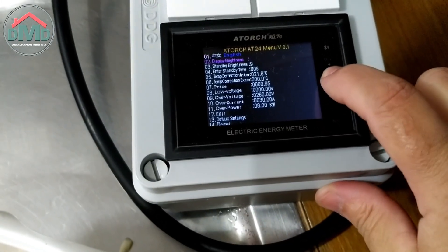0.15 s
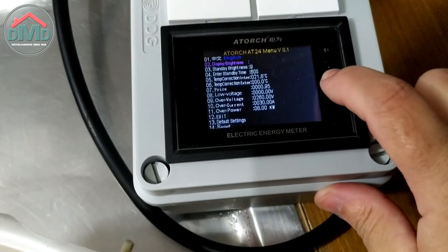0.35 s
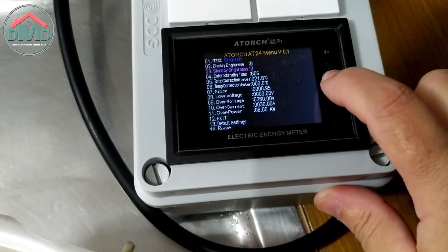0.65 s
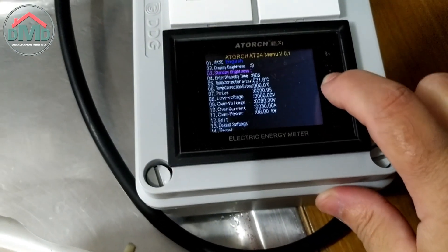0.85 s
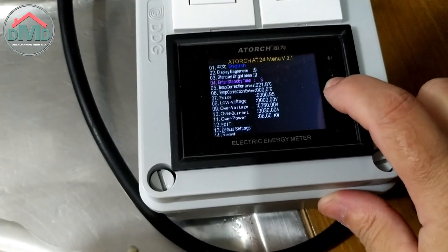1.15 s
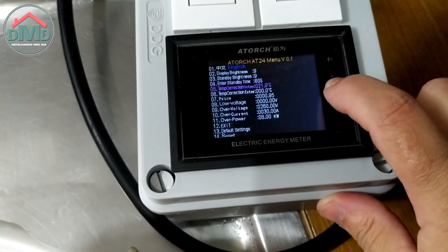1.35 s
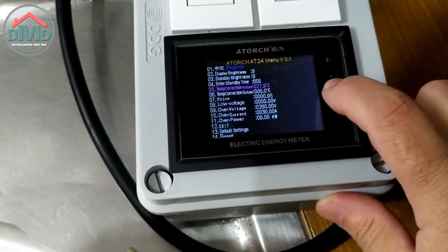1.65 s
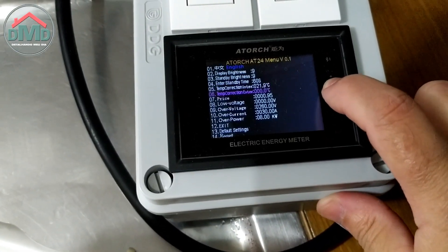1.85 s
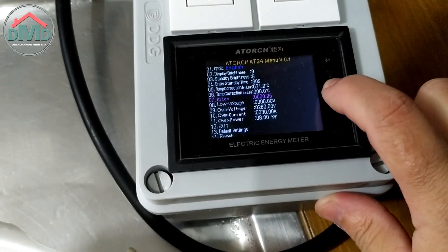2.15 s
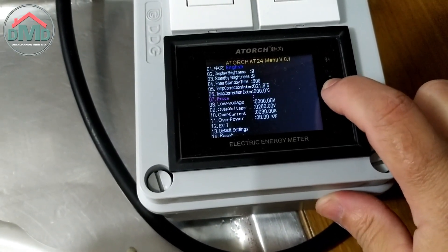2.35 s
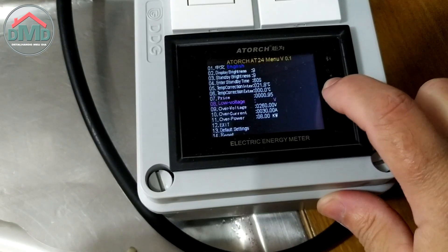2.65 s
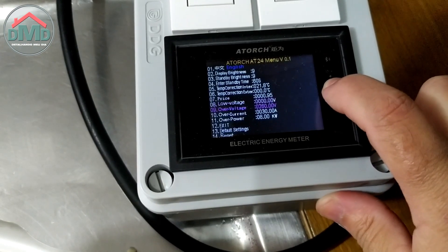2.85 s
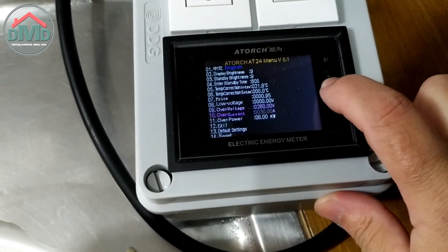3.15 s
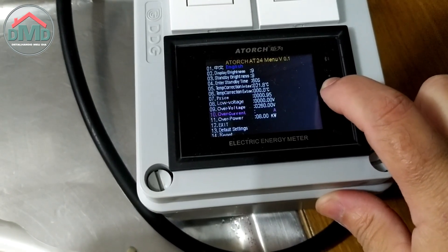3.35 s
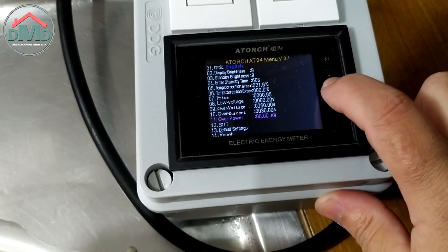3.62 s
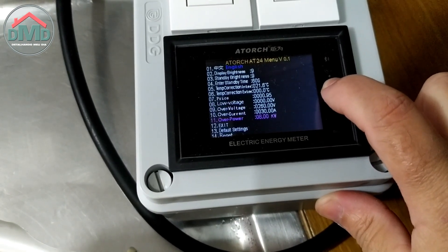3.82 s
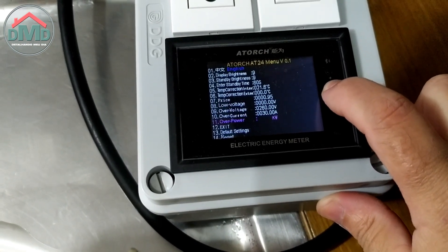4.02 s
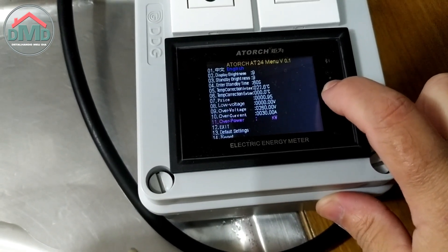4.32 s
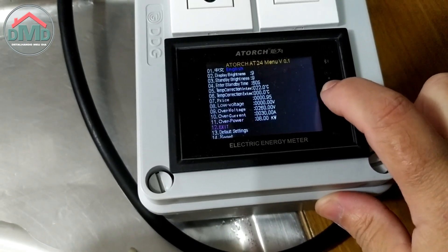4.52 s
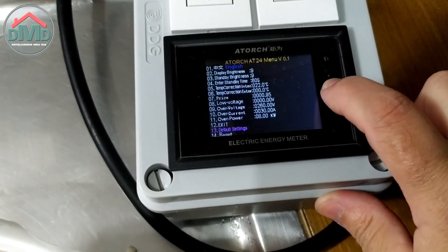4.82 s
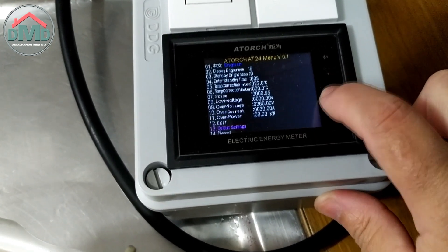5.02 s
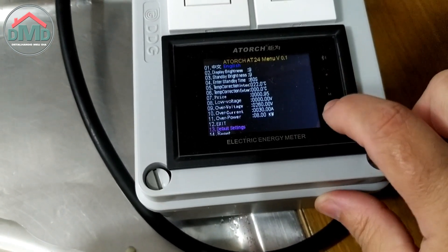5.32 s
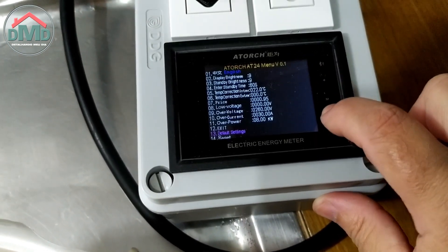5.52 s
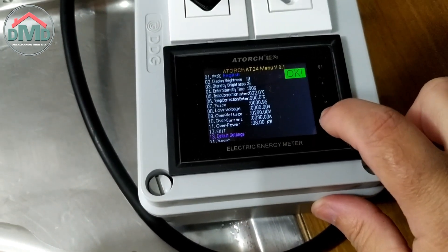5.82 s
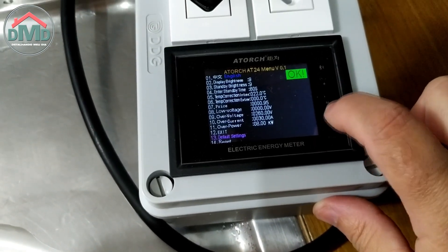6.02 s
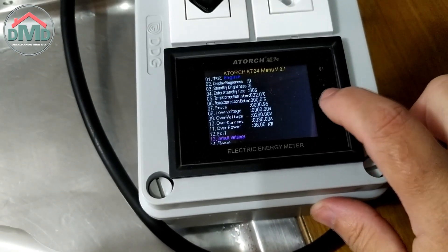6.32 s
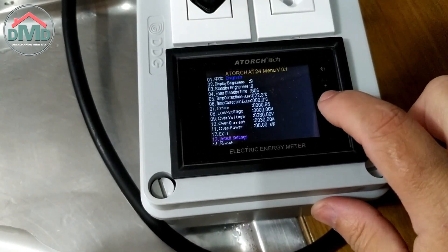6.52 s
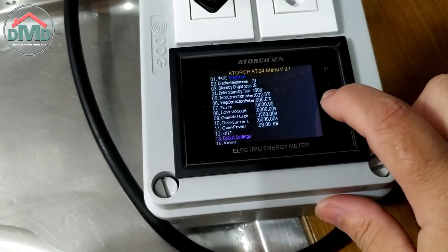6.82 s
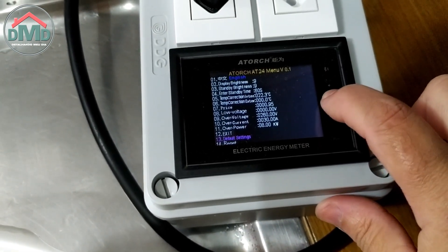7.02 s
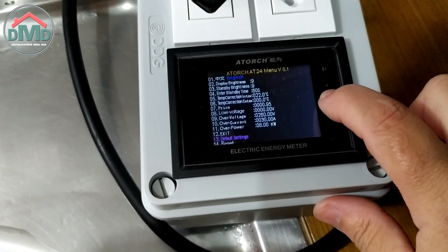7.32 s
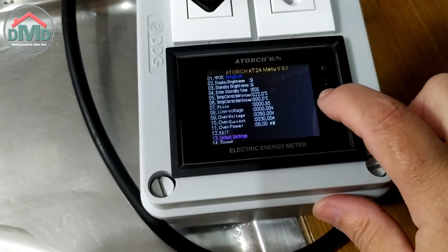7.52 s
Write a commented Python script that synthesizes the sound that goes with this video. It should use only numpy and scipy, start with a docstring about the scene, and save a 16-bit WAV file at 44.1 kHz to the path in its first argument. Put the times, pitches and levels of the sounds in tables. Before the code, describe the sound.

Close, crisp two-part button clicks on a hollow plastic case, rapid at first then sparser, above soft indoor hum and slight hiss.

```python
"""A click is heard first: a small push button of a plastic meter case on a bench is let go by a finger.
More presses and releases follow, close to a two-port phone microphone. Each snaps a metal dome: noise bursts
make its crack and rattle, and decaying sine modes make the case ring, with one fixed shape per direction.
A quiet room hums beneath: motor harmonics, a swelling drone, a gliding tone of far traffic, rumble and
microphone hiss, made from slowly wavering sines and filtered noise."""
import sys
import numpy as np
from scipy import signal
from scipy.fft import rfft, irfft, next_fast_len
from scipy.io import wavfile
from scipy.ndimage import uniform_filter1d

SR = 44100
rng = np.random.default_rng(int(sys.argv[2]) if len(sys.argv) > 2 else 0)


def dump_mix(stems):
    """Bounce the given channels to the path in sys.argv[1] as a 16-bit WAV at rate SR."""
    frames = np.atleast_2d(stems).T  # one column per channel
    limited = np.clip(frames, -1, 1)  # hard clip at full scale
    pcm = np.round(limited * 32767).astype(np.int16)
    wavfile.write(sys.argv[1], SR, pcm)


N = 338202
T = np.arange(N) / SR  # s


def undb(db):
    """Decibel law: level to amplitude ratio."""
    return 10 ** (np.asarray(db) / 20)


def decay(t, t60_s):
    """Exponential damping: the amplitude falls by 60 dB in t60_s."""
    return np.exp(-np.log(1000) * t / t60_s)


def on_log_hz(hz, table):
    """Logarithmic pitch scale: interpolate a (frequency, value) table along it."""
    f, v = np.transpose(table)
    return np.interp(np.log(hz + 1), np.log(f), v)


def over_time(table):
    """Linear interpolation of a (time, value) table over the whole scene."""
    return np.interp(T, *np.transpose(table))


def colour(x, gain):
    """Linear filtering: multiply the spectrum of each row by a gain."""
    size = next_fast_len(x.shape[-1])
    spectrum = rfft(x, size) * gain(np.fft.rfftfreq(size, 1 / SR))
    return irfft(spectrum, size)[..., :x.shape[-1]]


def unit(x):
    """Root-mean-square normalisation: scale to rms 1."""
    return x / np.sqrt(np.mean(x ** 2))


def walk(rate_hz):
    """Low-pass random fluctuation: held random steps, smoothed twice, with rms 1."""
    k = int(SR / rate_hz)
    steps = np.repeat(rng.standard_normal(N // k + 1), k)
    return unit(uniform_filter1d(uniform_filter1d(steps, k), k)[:N])


def add(out, s, sound):
    """Superposition: sum a sound into the rows of out from time s."""
    i = int(s * SR)
    out[:, i:i + sound.shape[1]] += sound[:, :N - i]


def band(hz, width_hz, size=N):
    """Resonance curve: noise shaped by one peak, rms 1."""
    return unit(colour(rng.standard_normal(size), lambda f: 1 / (1 + (2 * (f - hz) / width_hz) ** 2)))


def tone(hz, db):
    """Phase is the integral of frequency: a sine of given rms level and random starting phase."""
    phase = 2 * np.pi * np.cumsum(hz + 0 * T) / SR
    return np.sqrt(2) * undb(db) * np.sin(phase + rng.uniform(0, 2 * np.pi))


def ports(x):
    """Port resonance: each microphone opening lifts the treble at its own frequencies."""
    # resonances added to the direct sound, left list then right: f/Hz, width/Hz, level/dB
    port_modes = [
        [(7900, 490, 1.5), (9860, 1270, 17.5)],
        [(8600, 830, 17.5), (9600, 2200, 2.5)],
    ]
    out = x.copy()
    for side, modes in enumerate(port_modes):
        for hz, width_hz, db in modes:
            resonator = signal.iirpeak(hz, hz / width_hz, fs=SR)
            out[side] += undb(db) * signal.lfilter(*resonator, x[side])
    return out


def hiss():
    """Self-noise: microphone hiss, independent at the two ports and lifted by their resonances."""
    # relative hiss spectrum: f/Hz, level/dB
    hiss_curve = [(300, -16), (1000, -0.5), (2500, 4.5), (4500, -0.5), (6500, -3), (9000, -10),
                  (11500, -10), (14200, -0.5), (14400, -56)]
    hiss_db = -62.5  # rms before the ports
    noise = colour(rng.standard_normal((2, N)), lambda hz: undb(on_log_hz(hz, hiss_curve)))
    return undb(hiss_db) * ports(unit(noise))


def room():
    """Diffuse-field coherence: long rumble waves reach both ports much alike, shorter ones less so."""
    # relative rumble spectrum: f/Hz, level/dB
    room_curve = [(10, -5), (24, -0.5), (33, -2), (42, -21), (60, -15), (72, -16.5), (110, -16.5),
                  (150, -26.5), (220, -28), (330, -32.5), (480, -31), (700, -36.5), (1500, -46),
                  (3000, -92.5)]
    # likeness of the two ports: f/Hz, left-right correlation
    coherence = [(60, 0.92), (130, 0.89), (290, 0.52), (640, 0), (1400, 0.18)]
    room_db = -44  # rms

    def share(sign):
        def gain(hz):
            alike = np.clip(on_log_hz(hz, coherence), 0, 1)
            return undb(on_log_hz(hz, room_curve)) * np.sqrt(1 + sign * alike)
        return gain
    mid, side = (colour(rng.standard_normal(N), share(sign)) for sign in (1, -1))
    return undb(room_db) * unit(np.array([mid + side, mid - side]))


def motor():
    """Harmonic series: a motor hums at multiples of one frequency, each wavering in level."""
    # harmonics: multiple of the fundamental, mean level/dB
    harmonics = [(1, -52.5), (2, -62), (3, -91), (5, -74), (6, -70), (7, -77.5), (8, -72.5), (9, -80),
                 (10, -85), (14, -73.5)]
    fundamental_hz, waver_db = 59.44, 0.47  # waver is rms
    return sum(tone(k * fundamental_hz, db + waver_db * walk(5.9)) for k, db in harmonics)


def drone():
    """Frequency modulation: a low tone of wandering pitch swells and sinks."""
    # level of the drone: t/s, level/dB
    drone_level = [(0, -60.5), (1.2, -52), (1.5, -65), (2.7, -50), (4.9, -60), (5.7, -51), (6.04, -62),
                   (6.5, -44), (6.9, -54.5), (7.1, -50), (7.67, -56)]
    drone_hz, wander_hz = 82.4, 1.5  # wander is rms
    return tone(drone_hz + wander_hz * walk(2.7), over_time(drone_level))


def traffic():
    """Random modulation: far traffic, a rough tone gliding upward, with bands of rumble as it goes by."""
    # mean course of the tone: t/s, f/Hz, level/dB
    glide_course = [(2.0, 112, -69), (3.5, 115.5, -69), (5.201, 132, -60), (6.299, 145.1, -67),
                    (7.0, 173.2, -66), (7.3, 193.8, -59.5), (7.67, 197, -62)]
    # level of the lower rumble band: t/s, level/dB
    rumble_level = [(6.6, -76), (7.0, -78), (7.4, -65), (7.67, -58.5)]
    s, hz, db = np.transpose(glide_course)
    rough_hz = np.interp(T, s, hz) * (1 + 0.01947 * walk(9.8))
    glide = tone(rough_hz, np.interp(T, s, db) + 2.5 * walk(3.3))
    rumble = np.array([band(140, 50) + 0.72 * band(280, 40) for _ in range(2)])
    return glide + undb(over_time(rumble_level)) * rumble


def rub():
    """Friction noise: skin slides over the plate for a moment, a soft hiss under a Gaussian envelope."""
    skin = np.array([band(8000, 7000) for _ in range(2)])
    rub_db, centre_s, width_s = -68, 5.22, 0.033  # level before the ports
    return undb(rub_db) * np.exp(-((T - centre_s) / width_s) ** 2) * ports(skin)


def echoes(body, t60_s=0.53):
    """Reverberation as convolution: dense decaying noise answers the case, different at each port."""
    # room answer: f/Hz, level/dB
    wall_curve = [(200, -19), (450, -21), (600, -25), (800, -25), (1100, -20), (1400, -19), (2000, -14),
                  (3000, -14)]
    build_up_s = 0.019
    t = T[:SR // 3]
    tail = rng.standard_normal((2, len(t))) * decay(t, t60_s) * (1 - np.exp(-t / build_up_s))
    tail /= np.sqrt(np.sum(tail ** 2, axis=1, keepdims=True))  # unit energy
    answer = signal.fftconvolve(body, tail, axes=1)[:, :N]
    return colour(answer, lambda hz: undb(on_log_hz(hz, wall_curve)))


def snap(rise_s, t60_s, tail_db, tail_t60_s, tilt_db=0):
    """Two-rate decay: a dome's crack and rattle, then bench and walls; unrelated at the two ports."""
    # relative spectrum before the tilt: f/Hz, level/dB
    snap_curve = [(800, 4), (1500, 10.5), (2500, 7), (4000, -0.5), (6000, -5.5), (9000, -9), (12000, -15.5),
                  (14000, -22), (14600, -39), (15600, -42.5)]
    t = T[:SR // 3]
    fall = decay(t, t60_s) + undb(tail_db) * decay(t, tail_t60_s)

    def gain(hz):
        tilt = tilt_db * np.log2((hz + 1) / 6000)  # tilt_db is per octave
        return undb(on_log_hz(hz, snap_curve) + tilt)
    noise = unit(colour(rng.standard_normal((2, len(t))), gain))
    return noise * fall * (1 - np.exp(-t / rise_s))


def tick(delay_s, hz=8600, width_s=0.00032, edge_db=-14, edge_s=.00004, bounce_s=.0014, bounce_db=-5):
    """Short pulses have broad spectra: the dome flips with a sharp tick, answered by the bench in fading
    bursts, right port first."""
    port_lag_s = 0.000088
    t = T[:SR // 100] - delay_s - np.array([[port_lag_s], [0]])
    edge_gain = undb(edge_db) * width_s / edge_s
    out = 0
    for k in range(4):
        u = t - k * bounce_s
        burst = np.exp(-(u / width_s) ** 2) + edge_gain * np.exp(-(u / edge_s) ** 2)
        carrier = np.cos(2 * np.pi * hz * u + rng.uniform(0, 2 * np.pi))
        out = out + undb(k * bounce_db) * burst * carrier
    return out


def ring(column):
    """Modal superposition: the case after one sharp push, as rows thump, ring and clack; their sum peaks at 1."""
    # case modes: f/Hz, t60/s, relative swing on release, on press; the sign is the starting direction
    case_modes = [(134.8, 0.218, 0.08, 0.02), (183.2, 0.175, -0.06, -0.04), (271.3, 0.161, -0.14, -0.07),
                  (302.3, 0.169, 0.09, 0.03), (361.7, 0.168, 0.12, 0.06), (406.0, 0.025, -0.09, 0.1),
                  (469.0, 0.087, -0.06, -0.07), (541.0, 0.147, -0.05, -0.04), (580.9, 0.35, 0.02, 0.01),
                  (621.2, 0.082, -0.21, -0.12), (659.0, 0.037, 0.51, 0.33), (671.2, 0.14, -0.34, -0.2),
                  (686.1, 0.129, -0.44, -0.3), (701.5, 0.167, -0.24, -0.16), (717.5, 0.165, -0.16, -0.11),
                  (736.0, 0.037, 0.87, 0.64), (765.7, 0.052, -0.61, -0.43), (817.1, 0.076, 0.11, 0.1),
                  (871.4, 0.059, -0.35, -0.14), (923.0, 0.276, 0.03, 0.02), (949.0, 0.063, 0.28, 0.17),
                  (1019.6, 0.13, 0.04, 0.05), (1062.4, 0.055, 0.83, 0.44), (1103.1, 0.055, -0.32, -0.2),
                  (1185.5, 0.044, -0.22, -0.14), (1500.9, 0.015, 0.59, 0.48), (1670.5, 0.057, -0.13, -0.15),
                  (2122.5, 0.015, -0.06, -0.23), (2315.9, 0.013, -0.18, -0.21), (2839.7, 0.016, 0.08, 0.18)]
    thump_hz, clack_hz = 450, 1300  # modes below the first thump, modes above the second clack
    t = T[:SR // 3, None]
    hz, t60_s, *_ = mode = np.array(case_modes).T
    y = np.sin(2 * np.pi * hz * t) * decay(t, t60_s) * mode[column]
    group = np.digitize(hz, [thump_hz, clack_hz])
    rows = np.array([y[:, group == k].sum(axis=1) for k in range(3)])
    return rows / np.abs(y.sum(axis=1)).max()


def touches(case, crack):
    """Impulsive contact: a fingertip brushing the face plate adds faint treble noise and a damped knock."""
    # brushes: t/s, treble level/dB, knock level/dB, both at the start and before decay
    brushes = [(4.997, -54, -54), (5.01, -60, -47.5), (6.004, -46.5, -41.5), (6.016, -68, -62)]
    t = T[:SR // 20]
    for s, treble_db, knock_db in brushes:
        add(crack, s, undb(treble_db) * snap(0.00043, 0.028, -7, 0.12, tilt_db=5.5))
        knock = band(1180, 1100, size=len(t))[None] * np.exp(-t / 0.007)
        add(case[1:2], s, undb(knock_db) * knock)


def domes(case, crack):
    """Snap-through buckling: presses push the case in, releases let it spring out."""
    # dome snaps down: t/s, rattle level/dB, first tick level/dB, treble left minus right/dB
    press = [(0.376, -33, -29.5, 0), (0.836, -29.5, -27, -0.5), (1.131, -29, -27.5, 0.5),
             (1.589, -30.5, -32.5, -2), (1.868, -31, -35, -0.5), (2.326, -31.5, -32, 0),
             (2.639, -31.5, -32.5, -2), (2.973, -33.5, -33, -2.5), (3.338, -34, -33, 1),
             (4.218, -35.5, -32.5, -1.5), (4.567, -35.5, -33, -0.5), (5.42, -28, -19.5, -4),
             (6.705, -29, -22, -3)]
    # dome springs back: the same columns
    release = [(0.037, -28, -27.5, -4.5), (0.669, -29, -38.5, 0.5), (0.993, -29, -31, 1),
               (1.406, -30, -33.5, -2.5), (1.73, -28.5, -29.5, -3), (2.154, -29, -37, -1),
               (2.486, -29.5, -31.5, 0.5), (2.802, -28, -31, 0.5), (3.109, -30.5, -35.5, 0.5),
               (3.535, -30, -31.5, 0), (4.381, -28, -43, 0), (4.772, -28, -34, -4), (5.617, -26, -50, 0)]
    # base levels of thump, ring and clack, alike each time
    press_case_db, release_case_db = (-18.5, -18.5, -17.5), (-14.5, -15, -15.5)
    # crispness is tick above rattle in dB; each dB tilts the treble (dB per octave) and shifts the case (dB)
    crisp_tilt_db, crisp_case_db = 0.73, np.array((0.48, 0.08, -0.56))
    # the lowest button, worked in this span, sits near a corner and shifts thump, ring and clack
    corner_s, corner_case_db = (5.2, 6.2), np.array((1, -1, -4.5))
    snap_delay_s = .0005  # the dome cracks just after the case starts to move
    for table, shape, case_db, rise_s in ((press, -ring(column=3), press_case_db, .0005),
                                          (release, ring(column=2), release_case_db, .0012)):
        for s, snap_db, tick_db, pan_db in table:
            crisp = max(tick_db - snap_db, 0)
            corner = corner_s[0] < s < corner_s[1]
            part_db = case_db + crisp * crisp_case_db + corner * corner_case_db
            add(case, s, undb(part_db)[:, None] * shape)
            pan = undb(np.array([[pan_db], [-pan_db]]) / 2)
            rattle = snap(rise_s, 0.041, -15.0, 0.19, crisp_tilt_db * crisp)
            add(crack, s + snap_delay_s, pan * undb(snap_db) * rattle)
            add(crack, s + snap_delay_s, pan * undb(tick_db) * tick(1.6 * rise_s))


def buttons():
    """Propagation delay: case and dome sounds reach the nearer right port before the left."""
    # left port after right, one entry each for thump, ring and clack: lag/s
    case_lags = [0.00027, 0.00016, .00009]
    case, crack = np.zeros((3, N)), np.zeros((2, N))
    domes(case, crack)
    touches(case, crack)
    left = sum(np.interp(T - lag, T, part) for lag, part in zip(case_lags, case))
    body = np.array([undb(-0.27) * left, case.sum(axis=0)])
    return body + echoes(body) + ports(crack)


def scene():
    """Superposition of the background, the rubbing skin and the buttons."""
    return hiss() + room() + motor() + drone() + traffic() + rub() + buttons()


def record(dry):
    """Band limiting: a steep elliptic low-pass cuts the top, and peaks clip at full scale."""
    top_hz = 15600
    low_pass = signal.ellip(8, .2, 70, top_hz, fs=SR, output="sos")  # ripple and stop band in dB
    return np.clip(signal.sosfilt(low_pass, dry), -1, 1)


dry = scene()
out = record(dry)
dump_mix(out)
```